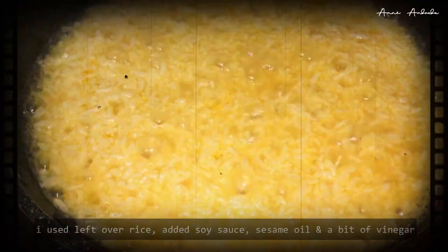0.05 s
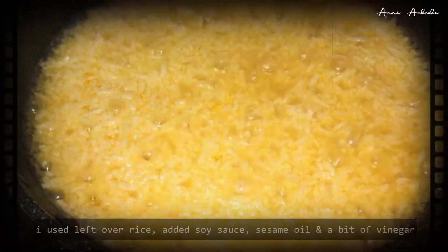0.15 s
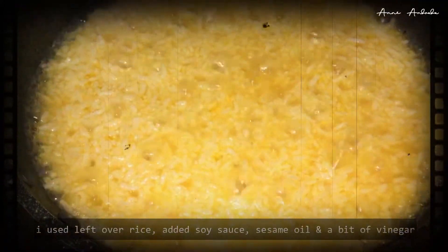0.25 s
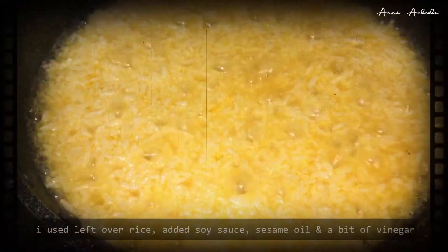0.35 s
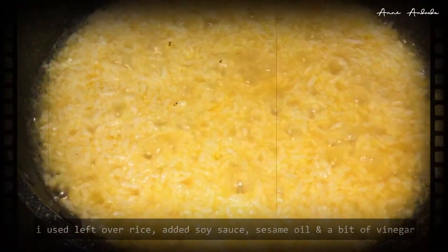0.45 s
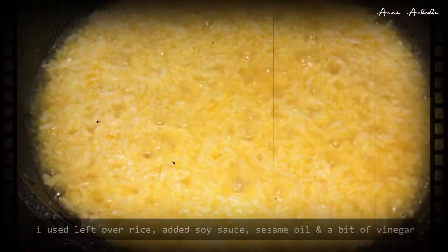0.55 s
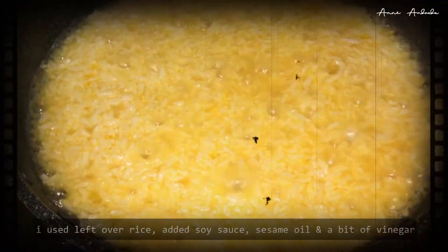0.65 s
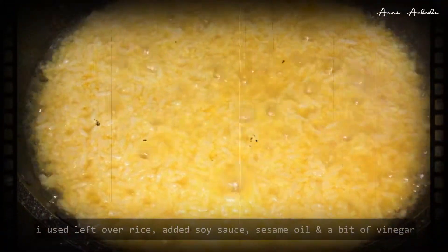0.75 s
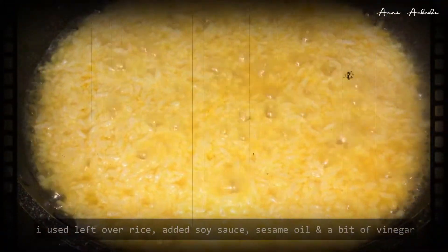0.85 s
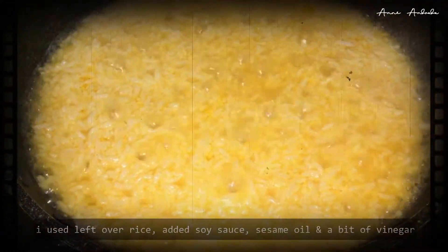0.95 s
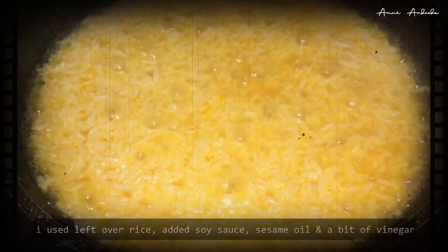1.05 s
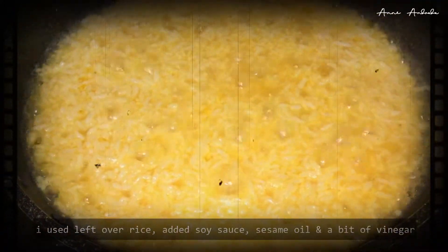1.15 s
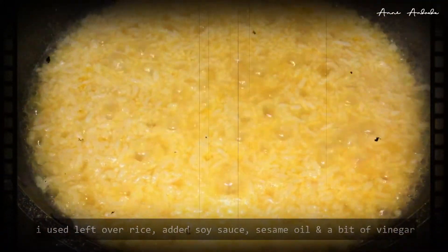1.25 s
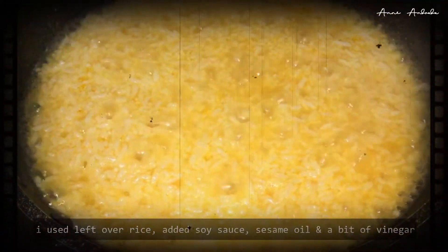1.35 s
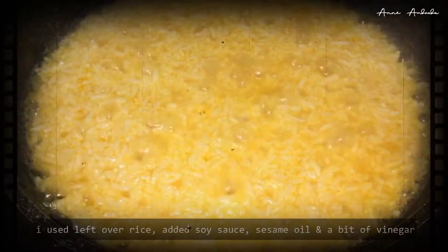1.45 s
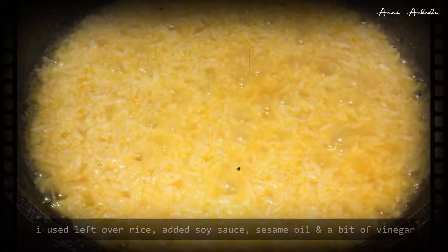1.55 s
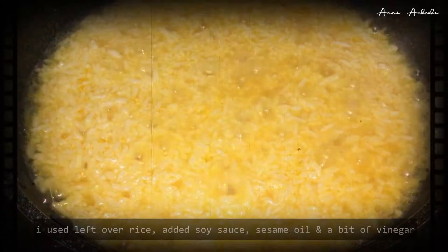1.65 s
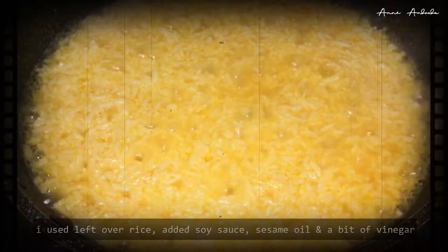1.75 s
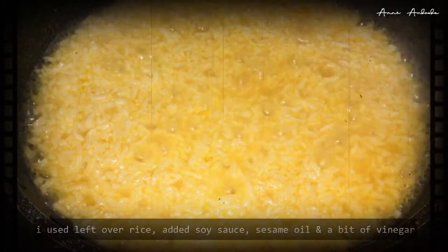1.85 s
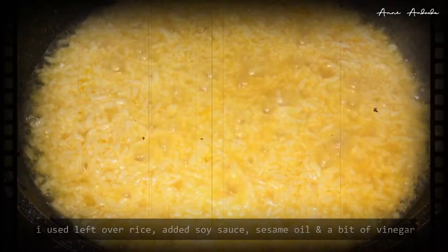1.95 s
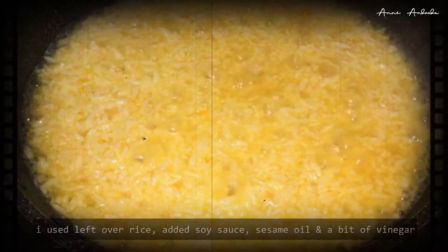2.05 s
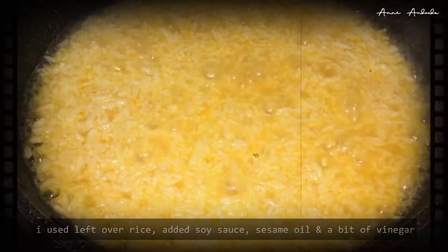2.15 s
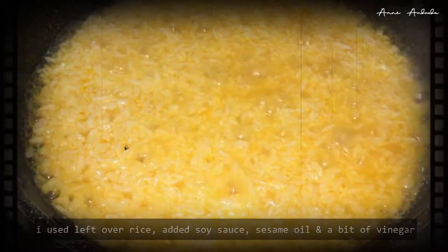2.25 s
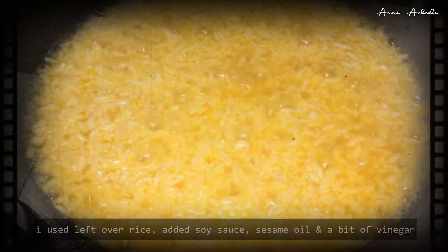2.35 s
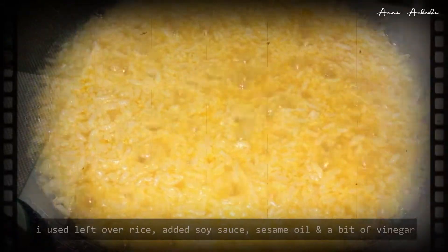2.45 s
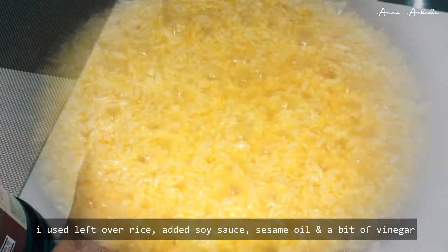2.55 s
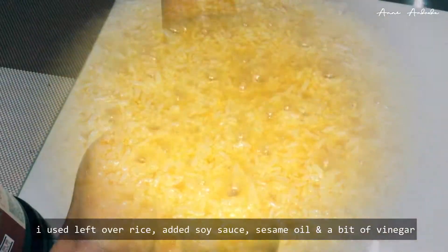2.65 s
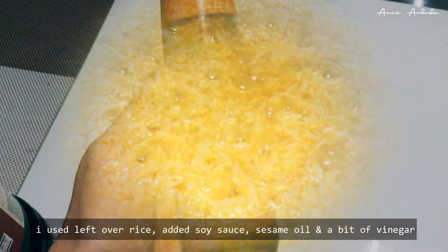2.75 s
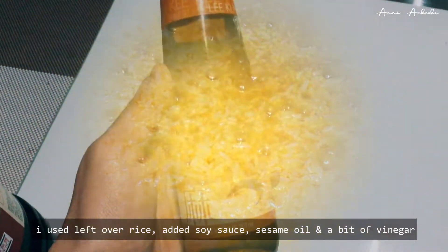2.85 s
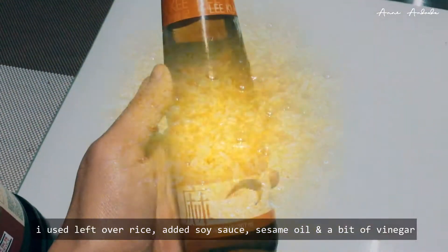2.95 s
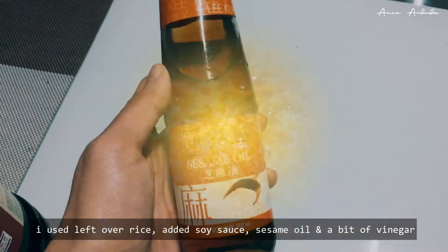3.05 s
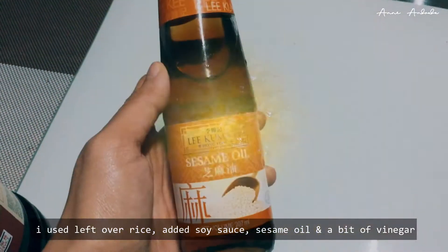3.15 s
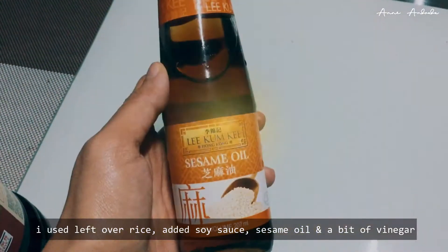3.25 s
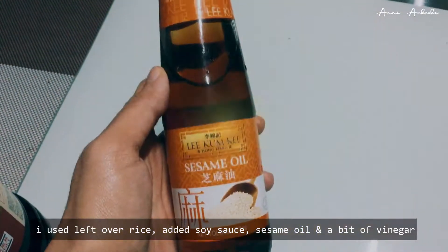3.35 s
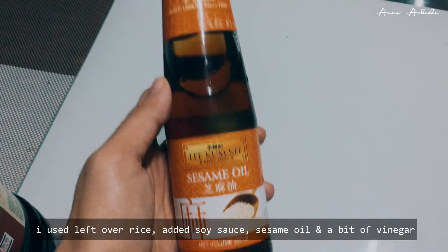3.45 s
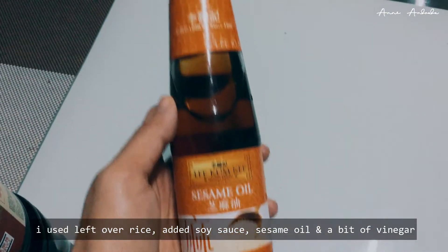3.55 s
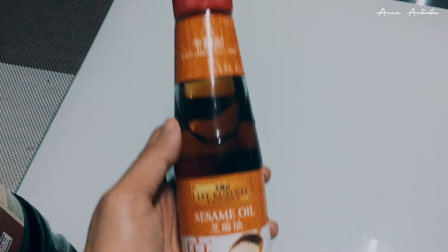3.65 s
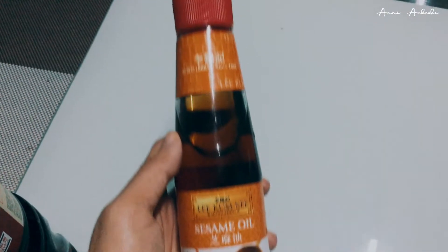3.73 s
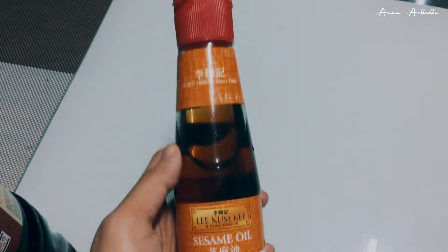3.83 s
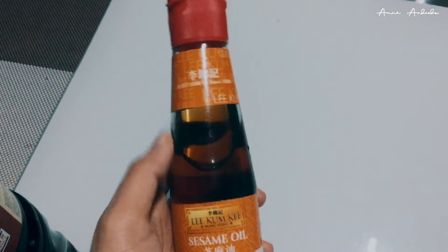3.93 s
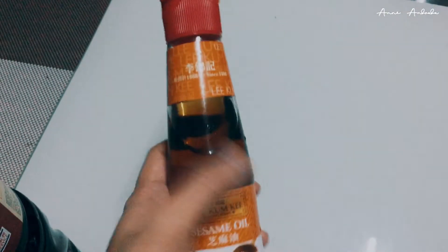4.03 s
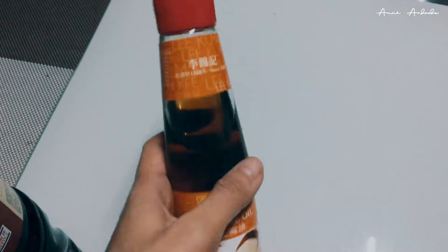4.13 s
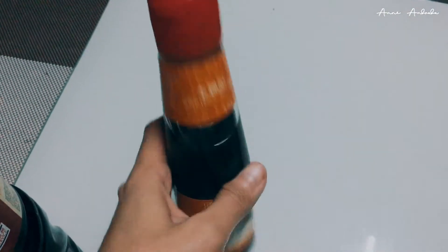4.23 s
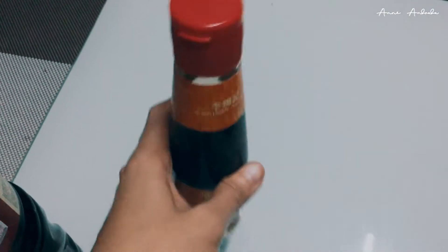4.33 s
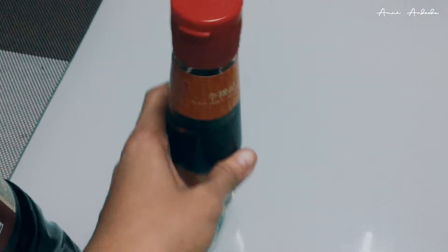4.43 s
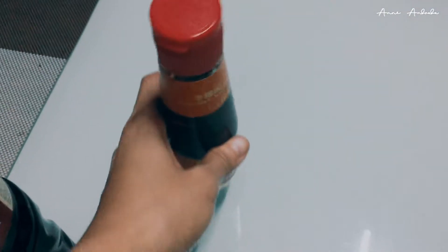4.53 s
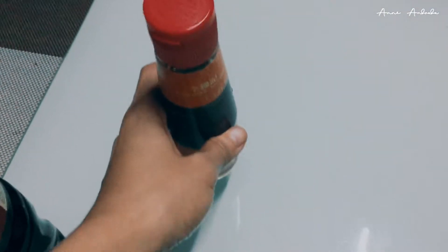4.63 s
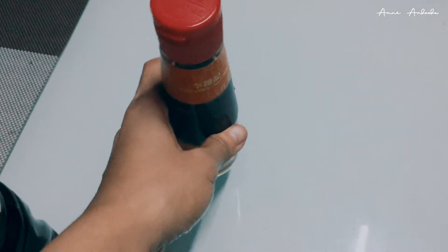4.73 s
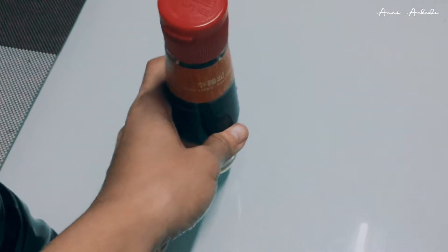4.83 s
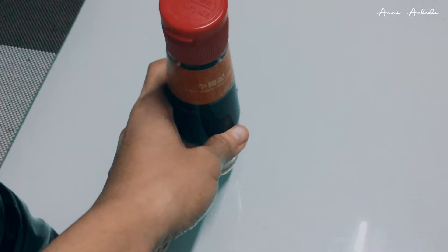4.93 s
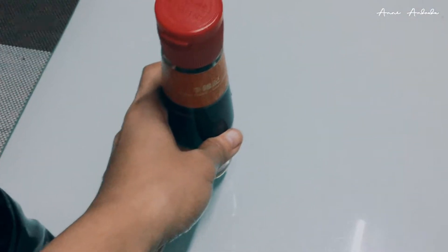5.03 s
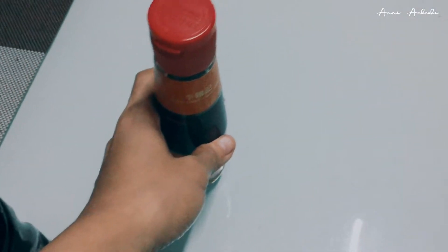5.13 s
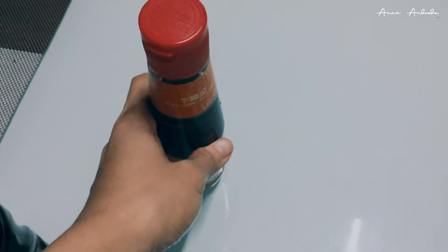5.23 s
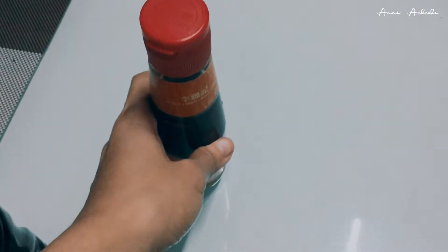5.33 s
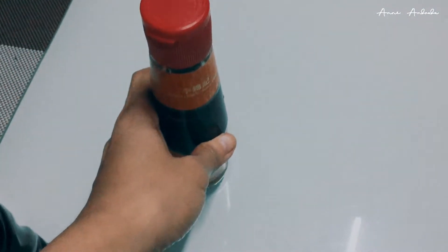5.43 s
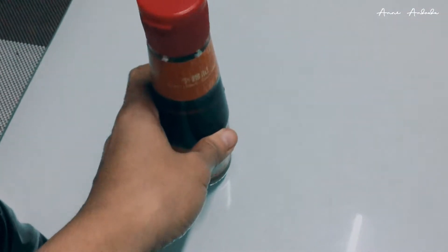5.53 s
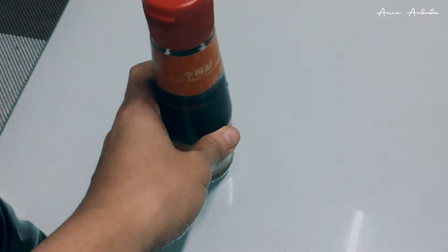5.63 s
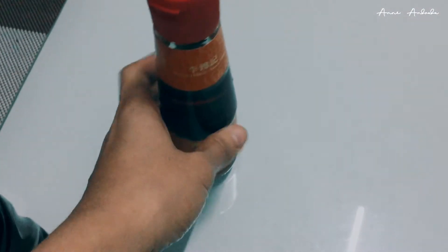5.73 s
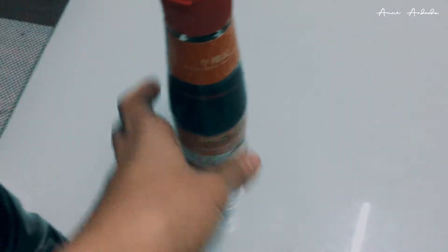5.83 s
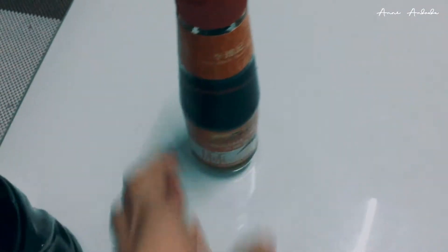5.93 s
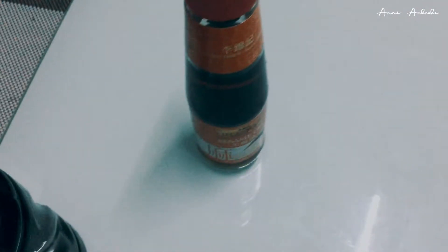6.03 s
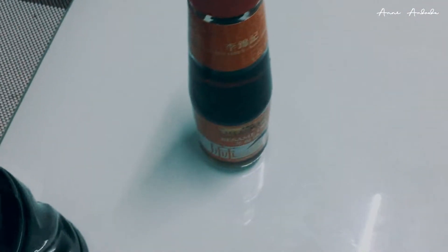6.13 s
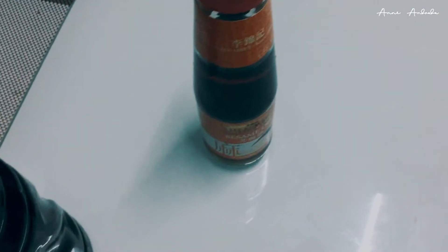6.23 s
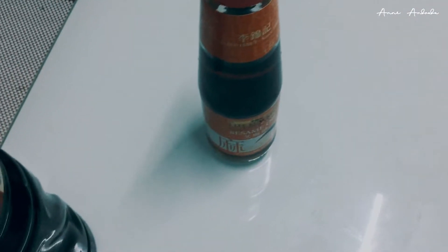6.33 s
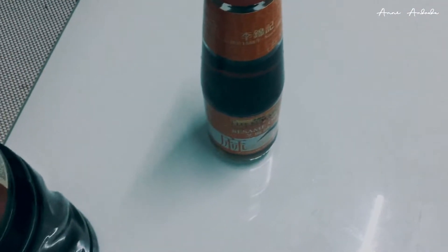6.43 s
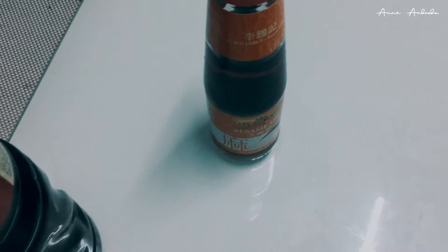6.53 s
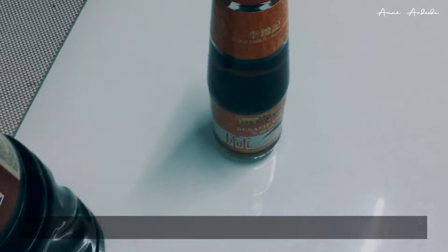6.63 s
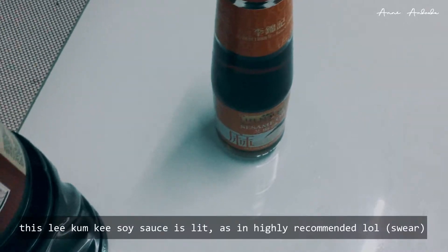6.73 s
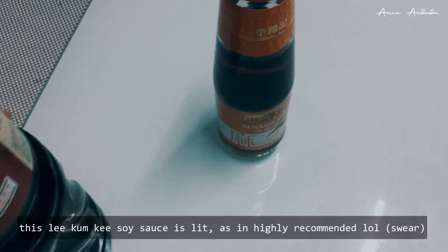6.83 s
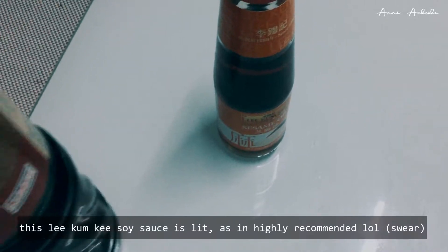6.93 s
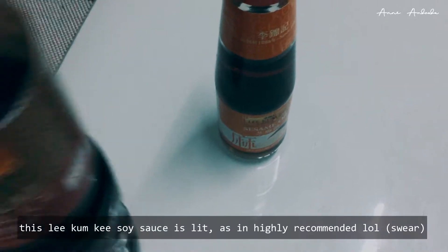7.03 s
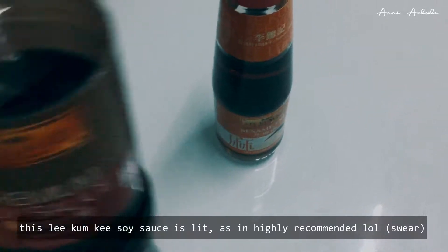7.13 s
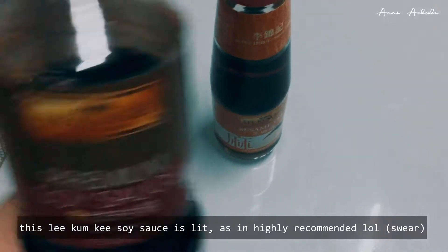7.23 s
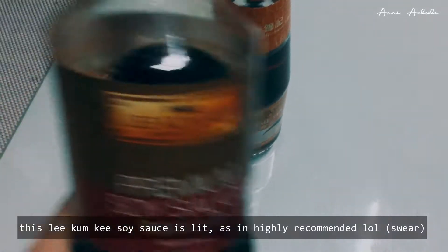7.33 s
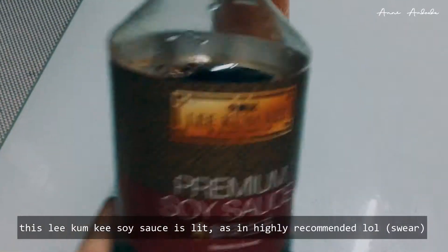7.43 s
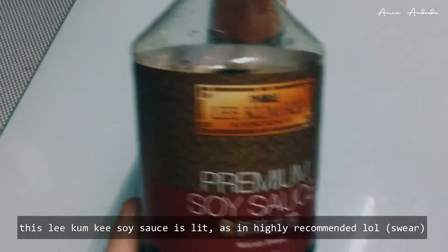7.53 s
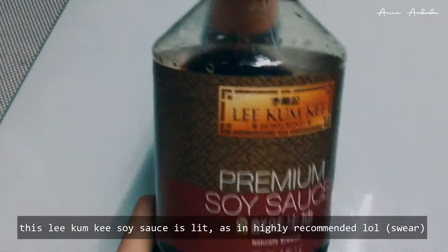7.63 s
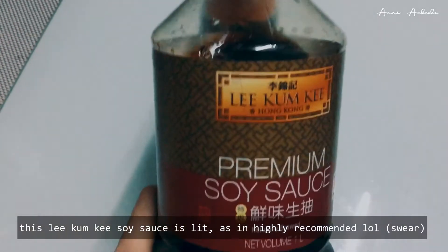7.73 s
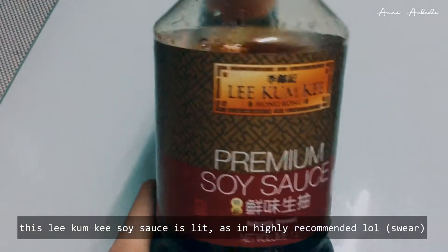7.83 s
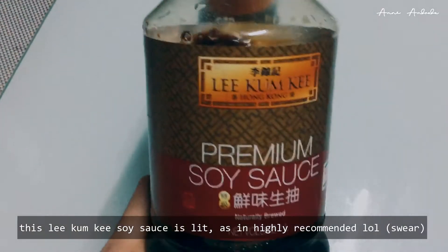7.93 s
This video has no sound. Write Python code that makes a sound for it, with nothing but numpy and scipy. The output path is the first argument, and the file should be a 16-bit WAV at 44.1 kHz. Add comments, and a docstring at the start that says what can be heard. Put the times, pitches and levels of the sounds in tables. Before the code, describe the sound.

Close sizzling, popping rice stops dead after almost three seconds; a quiet kitchen follows, with bottle slides and sharp glass knocks on a hard surface.

```python
"""In a kitchen, wet rice bubbles and spits in a hot pan close to the microphone; it sinks and stops short.
Bubbles and spits are short rings with a pitch of their own; starch skins snap in single pulses.
Then, in quiet room murmur, glass bottles are slid, set down and rocked on a hard counter.
Slides are shaped noise with a counter hum near 340 Hz; knocks strike decaying modes, and the room answers."""
import sys
import numpy as np
from scipy import signal
from scipy.fft import rfft, irfft
from scipy.io import wavfile

SR = 44100
rng = np.random.default_rng(int(sys.argv[2]) if len(sys.argv) > 2 else 0)


def dump_mix(stems):
    """Bounce the given channels to the path in sys.argv[1] as a 16-bit WAV at rate SR."""
    frames = np.atleast_2d(stems).T  # one column per channel
    limited = np.clip(frames, -1, 1)  # hard clip at full scale
    pcm = np.round(limited * 32767).astype(np.int16)
    wavfile.write(sys.argv[1], SR, pcm)


N = 351918
TIME = np.arange(N) / SR
PAN_CUT_S = 2.752


def amp(db):
    """dB to gain."""
    return 10 ** (np.asarray(db) / 20)


def rms_one(x):
    """Scale to unit power."""
    return x / np.sqrt(np.mean(x ** 2) + 1e-20)


def filtered(x, order, hz, kind="low"):
    """Butterworth filter."""
    return signal.sosfilt(signal.butter(order, hz, kind, fs=SR, output="sos"), x)


def at_hz(points, hz):
    """Read a table on a log-frequency axis."""
    table = np.array(points)
    return np.interp(np.log(hz), np.log(table[:, 0]), table[:, 1])


def drift(rate_hz, size=N):
    """Slow chance, spread 1: noise through a two-pole low-pass, drawn once every 40 samples."""
    r = np.exp(-80 * np.pi * rate_hz / SR)
    noise = rng.standard_normal(size // 40 + 2002)
    slow = signal.lfilter([1], [1, -2 * r, r * r], noise)[2000:]
    return np.interp(np.arange(size) / 40, np.arange(len(slow)), rms_one(slow))


def ring(clicks, hz, t60_s):
    """A unit click sets a decaying sine of starting height 1 ringing."""
    r, w = amp(-60 / (t60_s * SR)), 2 * np.pi * hz / SR
    return signal.lfilter([0, np.sin(w)], [1, -2 * r * np.cos(w), r * r], clicks + 1e-18)


def coloured(x, spectrum):
    """Give a broadband sound the spectrum of a table; rms 1."""
    hz = np.maximum(np.fft.rfftfreq(N, 1 / SR), 1)
    return rms_one(irfft(rfft(x) * amp(at_hz(spectrum, hz)), N))


def swells(times, heights, half_width_s):
    """Bell-shaped rises and falls around some moments."""
    widths = np.broadcast_to(half_width_s, len(times))
    return sum(h * np.exp(-((TIME - s) / w) ** 2) for s, h, w in zip(times, heights, widths))


def decaying_noise(t60_table, length_s):
    """Noise that dies away band by band: the answer of a hard-walled space to a click."""
    t = TIME[:round(length_s * SR)]
    edges = 70 * 2 ** np.arange(0, 8.1, .5)
    tail = np.zeros(len(t))
    for lo, hi in zip(edges, edges[1:]):
        band = filtered(rng.standard_normal(len(t)), 2, [lo, hi], "band")
        tail += band * amp(-60 * t / at_hz(t60_table, np.sqrt(lo * hi)))
    tail *= np.minimum(t / 0.0035, 1)
    return tail / np.sqrt(np.sum(tail ** 2))


def grains(per_s, spread_db, clump_db, spectrum, cycles, smooth_db):
    """Tiny bursts at random, in clumps, each ringing a few cycles at its own pitch, over a blur of far ones."""
    span = round(PAN_CUT_S * SR)
    sizes = amp(spread_db * np.minimum(rng.exponential(1, N), 3)) * rng.choice([-1, 1], N)
    clumps = amp(clump_db * drift(28))
    born = rng.random(N) < per_s * clumps / SR
    pitches = np.geomspace(spectrum[1][0], spectrum[-2][0], 24)
    dealt = rng.integers(0, len(pitches), N)
    near = np.zeros(N)
    for k, hz in enumerate(pitches):
        # each size of bubble has busy and calm moments of its own
        clicks = (sizes * born * (dealt == k))[:span] * amp(3.44 * drift(14.8, size=span))
        # ringing twice softens the start
        near[:span] += ring(ring(clicks, hz, cycles / hz), hz, 3.24 / hz) * hz ** 2
    far = amp(smooth_db) * rng.standard_normal(N) * np.sqrt(clumps)
    return coloured(near / np.std(near[:span]) + far, spectrum) * np.sqrt(span / N)


COMPANIONS, CLUSTER_S = 3, 0.012   # weaker bursts around each one, and the scale of their spread in time


def pops(rows, cycles, splutter_db, companions_db):
    """A bubble swells open, rings briefly with rising pitch and splutters; neighbours burst around it."""
    out, t = np.zeros(N), TIME[:900]
    for s, peak_db, hz in rows:
        bursts = [(s, peak_db, hz)]
        for late, louder, higher in rng.uniform(-1, 1, (COMPANIONS, 3)):
            bursts.append((s + CLUSTER_S * (late + 0.45), peak_db + companions_db + 3.4 * louder,
                           hz * 1.646 ** higher))
        for at, db, f in bursts:
            f = min(f, 15000)
            swell = np.minimum(f * t / 2.0, 1) ** 2
            tone = np.sin(2 * np.pi * f * t * (1 + 40 * t)) * amp(-60 * f * t / cycles) * swell
            i = round(max(at, 0) * SR)
            out[i:i + len(t)] += amp(db) * tone / np.abs(tone).max()
        noise = rng.standard_normal(len(t))
        sparse = noise * (np.abs(noise) > 2)
        drops = ring(ring(sparse, 0.84 * hz, 4.6 / hz), 0.58 * hz, 3.3 / hz)
        fall = amp(peak_db + splutter_db - 60 * t / 0.025)
        i = round(s * SR)
        out[i:i + len(t)] += rms_one(drops) * fall * np.minimum(t / 0.00147, 1)
    return out


def pan_fade_db():
    """The steady boil and spitting sink before the pan stops."""
    from_s, db_per_s = 2.214, 10.5
    return -db_per_s * np.maximum(TIME - from_s, 0)


# Middle-sized bubbles, heard close. Each row: frequency in Hz, relative density in dB per Hz.
BUBBLING = [(260, -15), (450, -8.5), (690, 7), (880, -3.5), (1220, 4), (2400, 1.5), (3200, -1),
            (4400, -11.5), (5400, -20.5), (6200, -34), (7200, -26.5), (10000, -50)]
# Low bubbles deep in the pan. Each row: frequency in Hz, relative density in dB per Hz.
BURBLE = [(30, -50.5), (90, -18), (140, -7), (199, -4), (299, 2.5), (467, -14.5), (600, -15), (780, -58),
          (1320, -81.5)]
# The boil surges for a moment. Each row: centre in seconds, bubbling rise in dB, burble rise in dB.
SURGES = [(0.029, 7, 9.5), (0.101, 6, 8.5), (0.389, 8, 8.5), (0.74, 4.5, 6), (1.101, 6, 6),
          (1.553, 7.5, 8.5), (1.938, 2, 7.5), (2.032, 4.5, 7), (2.17, 0, 4.5), (2.33, -2, 4),
          (2.41, 7, 10.5), (2.65, 2.5, 9), (2.731, 6.5, 7.5)]
SURGE_S = 0.018   # half width
BUBBLING_DB, BURBLE_DB = -46.5, -51.5   # before surges and fade


def boil():
    """Two crowds of ringing bubbles, middle and low, that surge at the same moments."""
    s, bubbling_rise_db, burble_rise_db = np.transpose(SURGES)
    fade_db = pan_fade_db()
    bubbling = amp(BUBBLING_DB + fade_db + swells(s, bubbling_rise_db, SURGE_S))
    burble = amp(BURBLE_DB + fade_db + swells(s, burble_rise_db, SURGE_S))
    middle = bubbling * grains(2600, 4.14, 2.5, BUBBLING, cycles=6.5, smooth_db=-1.5)
    low = burble * grains(300, 2.4, 3.4, BURBLE, cycles=12.0, smooth_db=16.0)
    return middle, low


# Fine spitting, the treble of the pan. Each row: frequency in Hz, relative density in dB per Hz.
SPITTING = [(2650, -36.5), (4500, 9), (6000, -2.5), (8000, -5.5), (12000, -9.5), (15300, -16),
            (16000, -32.5)]
# The loudest single spits at the microphone. Each row: start in seconds, peak in dB, starting pitch in Hz.
SPITS = [(0.1185, -40, 11000), (0.1757, -44, 7830), (0.212, -46, 7800), (0.278, -44.5, 6500),
         (0.3696, -45, 7040), (0.4392, -42, 6960), (0.474, -39.5, 13300), (0.5097, -41, 6670),
         (0.5515, -44, 6840), (0.606, -57, 9430), (0.6394, -41, 6200), (0.7016, -47, 9000),
         (0.737, -38.5, 6840), (0.7751, -53, 12280), (0.81, -45.5, 14600), (0.8874, -52, 11900),
         (0.938, -42.5, 6500), (0.9653, -37, 9600), (1.07, -42.5, 8500), (1.1373, -38, 6520),
         (1.189, -38, 6560), (1.257, -40.5, 6950), (1.484, -42, 7000), (1.559, -40.5, 6570),
         (1.608, -44, 13000), (1.6402, -46, 6960), (1.7365, -44.5, 9700), (1.77, -52, 7170),
         (1.807, -50, 12200), (1.8558, -39.5, 11900), (2.0054, -55, 9480), (2.0433, -47.5, 7120),
         (2.087, -61, 6960), (2.1387, -44, 7100), (2.164, -39, 8800), (2.2588, -46, 9630),
         (2.3176, -46, 6900), (2.404, -55, 7610), (2.4234, -40.5, 8910), (2.474, -49, 8380),
         (2.53, -46.5, 7000), (2.6584, -51, 12900), (2.7087, -58, 9650), (2.7294, -44, 10340)]
SPITTING_DB = -62.5   # before clumping and fade
SPIT_CLUMP_DB = 1.5   # slow random thickening and thinning
FLURRY_S, FLURRY_BELOW_DB = 0.016, 25.5   # half width; how far a flurry lies under its spit's peak


def spitting():
    """The smallest bubbles ring longest in cycles; their fine spray flares around each loud spit."""
    s, spit_db, _ = np.transpose(SPITS)
    steady = amp(SPITTING_DB + pan_fade_db() + SPIT_CLUMP_DB * drift(9.4))
    flurries = swells(s, amp(spit_db - FLURRY_BELOW_DB), FLURRY_S)
    fine = (steady + flurries) * grains(1500, 6.3, 6.0, SPITTING, cycles=33.0, smooth_db=-6.5)
    return fine + pops(SPITS, cycles=26.0, splutter_db=-10.5, companions_db=-6.0)


# Large bubbles bursting near the microphone. Each row: start in seconds, peak in dB, starting pitch in Hz.
POPS = [(0.032, -28.5, 2030), (0.066, -33.5, 1390), (0.186, -27, 2150), (0.339, -49, 2130),
        (0.38, -36, 670), (0.508, -33, 2050), (0.543, -30.5, 1750), (0.587, -32.5, 1250),
        (0.676, -40, 1320), (0.703, -31, 1580), (0.737, -36.5, 634), (0.845, -30, 1430),
        (0.921, -37.5, 1190), (1.038, -27, 1590), (1.087, -36, 590), (1.211, -29, 1780), (1.293, -34, 1300),
        (1.318, -28.5, 1750), (1.346, -32, 2520), (1.472, -33.5, 2980), (1.507, -25, 2230),
        (1.539, -37, 2103), (1.617, -26.5, 1830), (1.662, -30, 2880), (1.71, -40, 1250), (1.74, -35, 2550),
        (1.771, -27.5, 2370), (1.84, -32.5, 2960), (1.903, -31, 2200), (1.978, -44, 1800),
        (2.02, -27, 1820), (2.31, -35.5, 636), (2.353, -31.5, 1680), (2.537, -35, 1760), (2.639, -33, 1250),
        (2.689, -33.5, 2020)]


def large_bubbles():
    """Large bubbles ring only a few cycles each."""
    return pops(POPS, cycles=3.9, splutter_db=-8.5, companions_db=-8.5)


# Single sharp snaps in the rice. Each row: start in seconds, level in dB before SNAP_GAIN_DB, pitch in Hz.
SNAPS = [(0.032, -39, 3070), (0.186, -44, 3270), (0.378, -29.5, 5200), (0.5198, -25.5, 4300),
         (0.6774, -32, 3000), (1.0318, -31, 3120), (1.091, -33, 3170), (1.1268, -39, 3840),
         (1.3189, -39, 3150), (1.4266, -34, 3710), (1.473, -37, 3140), (1.508, -36, 3030),
         (1.539, -36, 3180), (1.662, -38, 3130), (1.7397, -33, 3080), (1.772, -32, 3250),
         (1.8397, -37, 3050), (1.9617, -34, 3140), (2.0198, -23.5, 3100), (2.106, -36, 3090),
         (2.3094, -31, 4220)]
SNAP_GAIN_DB, SNAP_CYCLES = 0.3, 0.63
SMALL_SNAPS_PER_S, SMALL_SNAP_DB = 120, -48.5   # the level is the faintest, before SNAP_GAIN_DB


def snaps():
    """A skin of starch bursts: a pulse of about one cycle, mostly a pull; many small ones fall at random."""
    draw = rng.random((round(SMALL_SNAPS_PER_S * PAN_CUT_S), 3))
    small_s = PAN_CUT_S * draw[:, 0]
    small_db = SMALL_SNAP_DB - 4.0 * np.log(1 - 0.97 * draw[:, 1])
    small_hz = 1500 * 4.5 ** draw[:, 2]
    out, t = np.zeros(N), TIME[:120] - TIME[60]
    for s, level_db, hz in [*np.c_[small_s, small_db, small_hz], *SNAPS]:
        pulse = np.cos(2 * np.pi * hz * t) * np.exp(-(hz * t / SNAP_CYCLES) ** 2)
        i = round(s * SR)
        out[i:i + len(t)] -= amp(level_db + SNAP_GAIN_DB) * pulse
    return out


def pan():
    """Bubbles, spits and snaps in the rice; the pan walls smear all but the low burble."""
    middle, low = boil()
    near = middle + spitting() + large_bubbles() + snaps()
    walls = signal.fftconvolve(near, decaying_noise([(500, 0.018), (9000, 0.023)], 0.05))[:N]
    return (near + amp(-12.5) * walls + low) * (TIME < PAN_CUT_S)


# Kitchen murmur of air and machines. Each row: time in seconds, level in dB before the wavering.
KITCHEN = [(0, -57), (2.4, -59.5), (2.76, -64.5), (3.1, -65), (3.6, -63.5), (4.5, -61), (6.8, -62.5),
           (7.98, -58)]
# Its dull colour. Each row: frequency in Hz, relative density in dB per Hz.
KITCHEN_COLOUR = [(30, -23), (70, -31.5), (124, -12.5), (204, 1), (243, -5.5), (337, 1.5), (402, -11.5),
                  (733, -11.5), (990, -17.5), (1720, -19), (2200, -31.5), (3650, -47.5), (16000, -64.5)]


def kitchen():
    """Dull room noise whose low and high parts waver apart."""
    low = filtered(coloured(rng.standard_normal(N), KITCHEN_COLOUR), 2, 900)
    high = filtered(coloured(rng.standard_normal(N), KITCHEN_COLOUR), 2, 900, "high")
    level = amp(np.interp(TIME, *np.transpose(KITCHEN)))
    return level * (amp(0.6 * drift(13)) * low + amp(1.9 * drift(6.0)) * high)


def stroke(start_s, attack_s, hold_s, level_db, release_s):
    """Gain of one drag: rise, hold, then an ever faster fall as the bottle slows."""
    t = TIME - start_s
    falling = np.clip(t - attack_s - hold_s, 0, 1) / release_s
    return np.clip(t / attack_s, 0, 1) * amp(level_db - 20 * falling ** 2)


# A bottle base dragged over the counter. Each row: start in seconds, hold in seconds, drumming level in dB,
# scuff level in dB, rumble level in dB, time to fall 20 dB in seconds.
SLIDES = [(3.127, 0.19, -47, -96.5, -73, 0.22), (3.46, 0.1, -63.5, -100, -73.5, 0.66),
          (5.444, 0.0063, -77.5, -53.5, -75, 0.25), (5.544, 0.013, -40.5, -49, -45, 0.1568),
          (5.619, 0.02, -47, -80, -80, 0.0964), (6.869, 0.063, -61.5, -99, -62, 0.3),
          (7.013, 0.031, -47.5, -90, -66, 0.03), (7.73, 0.034, -60, -110, -52, 0.1)]
# Glass drumming on the counter. Each row: frequency in Hz, relative density in dB per Hz.
DRUMMING = [(40, -40), (70, -24), (110, 0.5), (200, 2.5), (300, 9.5), (450, 8), (700, 2.5), (1100, -2),
            (1500, -7.5), (2200, -16), (3000, -25.5), (3600, -46.5), (6000, -60)]
# The hum of the counter. Each row: frequency in Hz, spread of its wander in Hz, mean relative level in dB.
COUNTER_HUM = [(340, 6.98, 6), (662, 20, -14), (955, 14, -14.5), (1430, 15, -14.5), (2017, 35, -23),
               (3030, 17, -32)]
# The counter shakes. Each row: frequency in Hz, relative density in dB per Hz.
RUMBLE = [(30, 4), (60, 3.5), (120, -4.5), (200, -8), (300, -46.5)]
# Hiss of grit under the glass. Each row: frequency in Hz, relative density in dB per Hz.
SCUFF = [(880, -16), (1500, -2.5), (2100, -6.5), (3660, -4.5), (5830, -13.5), (9750, -18), (11400, -19.5),
         (16000, -26)]
# Faint rustles of hand and label. Each row: centre in seconds, level in dB, half width in seconds.
RUSTLES = [(4.19, -81, 0.024), (5.887, -82, 0.02), (6.31, -82.5, 0.053), (6.96, -86.5, 0.019)]
SLIDE_ATTACK_S, SCUFF_ATTACK_S = 0.014, 0.0028
HUM_WANDER_HZ, HUM_WAVER_DB = 24.6, 1.5   # rate of the random waver; its spread in level


def slides():
    """Uneven slips of the glass drum on the counter and shake it as it hums; the grit hisses on top."""
    drumming, scuff, rumble = np.zeros(N), np.zeros(N), np.zeros(N)
    for s, hold, drum_db, scuff_db, rumble_db, fall in SLIDES:
        drumming += stroke(s, SLIDE_ATTACK_S, hold, drum_db, fall)
        scuff += stroke(s, SCUFF_ATTACK_S, hold, scuff_db, fall)
        rumble += stroke(s, SLIDE_ATTACK_S, hold, rumble_db, fall)
    slips = rng.standard_normal(N) * amp(3.0 * drift(75))
    hum = np.zeros(N)
    for hz, wander_hz, db in COUNTER_HUM:
        level = amp(db + HUM_WAVER_DB * drift(HUM_WANDER_HZ))
        pitch = hz + wander_hz * drift(HUM_WANDER_HZ)
        hum += level * np.sin(2 * np.pi * np.cumsum(pitch) / SR)
    dragged = drumming * rms_one(hum + coloured(slips, DRUMMING)) + rumble * coloured(slips, RUMBLE)
    grit = coloured(rng.standard_normal(N), SCUFF) * amp(1.3 * drift(120))
    s, rustle_db, width_s = np.transpose(RUSTLES)
    return dragged, (scuff + swells(s, amp(rustle_db), width_s)) * grit


# Glass on counter. Each row: start in seconds, body level in dB, crack in dB re body level, glass ring in dB
# re body level, contact softness (low-pass) in Hz, chatter time in seconds, send to the room in dB,
# counter boom (lift of the modes under 900 Hz) in dB.
KNOCKS = [(5.3106, -16, -52, -28.5, 2800, 0.0027, -6.5, 0),
          (5.3146, -18.5, -50, -36, 2570, 0.0035, -6.5, -4),
          (5.3175, -17, -54, -28.5, 2580, 0.0086, -7, -3.5), (5.447, -42, -30, -30, 4000, 0.0037, -5, -15),
          (5.563, -36.5, -47, -50, 1800, 0.016, -2, 20), (5.592, -36, -47, -52, 898, 0.0023, -6, 12),
          (5.661, -30.5, -41, -50, 1660, 0.0068, -4.5, 10), (5.682, -31, -41, -50.5, 1890, 0.014, -5, 12),
          (7.633, -15.5, -10, -50, 2104, 0.00093, -11.5, 4), (7.673, -16.5, -47, -39, 2280, 0.02, -6.5, -3),
          (7.725, -26.5, -20, -19, 3120, 0.0016, -3.5, 6), (7.738, -31, -14, -28, 3000, 0.0013, -16, -5),
          (7.741, -17.5, -11.5, -23, 2980, 0.0014, -12.5, 6), (7.777, -27, -38, -40, 1960, 0.0041, 2.5, -2),
          (7.782, -19.5, -27, -35, 2470, 0.022, -10, 5)]
# Bottle and counter together. Each row: mode in Hz, level in dB before boom and chance, 60 dB decay in seconds.
BODY = [(122.1, -17, 0.06), (173.4, -3, 0.034), (263.6, -1.5, 0.05), (335, 0.5, 0.044), (414, 5, 0.025),
        (533, -2, 0.024), (663, 2.5, 0.03), (1090, 2, 0.0157), (1250, 1.5, 0.02), (1430, 2.5, 0.014),
        (1680, 1.5, 0.014), (1960, 0.1, 0.012), (2287, 1, 0.009), (3050, -3.5, 0.0081)]
BLOW_SPREAD_DB = 1.5   # each blow lands elsewhere and wakes the modes differently
GLASS_RING_HZ, GLASS_RING_T60_S = 5150, 0.003   # the bottle wall's short bright ring
GLASS_ROOM_SHARE = 0.62   # gain of the ring on its way to the room


def knocks():
    """Each blow is a click and chatter, softened by the contact, into the body modes; a share goes to the room."""
    dry, wet, t = np.zeros(N), np.zeros(N), TIME[:7000]
    for s, peak_db, crack_db, glass_db, soft_hz, chatter_s, room_db, boom_db in KNOCKS:
        touches = rng.standard_normal(len(t)) * (rng.random(len(t)) < .35)
        chatter = touches * np.exp(-(t / chatter_s) ** 3) * 0.11
        chatter[0] = 1
        push = filtered(chatter, 4, soft_hz)
        # a broad slap of the glass rim fills between the modes
        slap = filtered(chatter, 3, [550, min(1.31 * soft_hz, 5600)], "band")
        # the low modes belong to the counter top, the high ones to the glass
        body, chance_db = np.zeros(len(t)), BLOW_SPREAD_DB * rng.standard_normal(len(BODY))
        for k, (hz, db, t60_s) in enumerate(BODY):
            mode_db = db + boom_db * (hz < 900) + chance_db[k]
            body += amp(mode_db) * ring(push, hz, t60_s) * (-1) ** k
        body = body / np.abs(body).max() + amp(-8.0) * slap / np.abs(slap).max()
        crack = signal.lfilter([.6], [1, -.7], rng.standard_normal(len(t)))
        crack *= amp(-60 * t / 0.0046) + amp(-30.0 - 60 * t / 0.15)
        glass = ring(ring(chatter, GLASS_RING_HZ, GLASS_RING_T60_S), GLASS_RING_HZ, GLASS_RING_T60_S / 2)
        glass *= amp(peak_db + glass_db) / np.abs(glass).max()
        blow = amp(peak_db) * (body + amp(crack_db) * crack)
        i = round(s * SR)
        dry[i:i + len(t)] += (blow + glass)[:N - i]
        wet[i:i + len(t)] += amp(room_db) * (blow + GLASS_ROOM_SHARE * glass)[:N - i]
    return dry, wet


# The hard room around the counter. Each row: frequency in Hz, 60 dB decay in seconds.
ROOM_T60 = [(100, 0.32), (600, 0.37), (2000, 0.28), (3500, 0.27), (5500, 0.181), (7000, 0.19),
            (12000, 0.17)]
SLIDE_ROOM_DB = -11   # send of the dragging to the room


def scene():
    """One microphone, first at the pan, then at the counter, where the hard room answers."""
    dragged, scuffed = slides()
    blows, to_room = knocks()
    room = signal.fftconvolve(to_room + amp(SLIDE_ROOM_DB) * dragged, decaying_noise(ROOM_T60, .5))[:N]
    return (pan() + kitchen() + dragged + scuffed + blows + room)[None]


def record(dry):
    """The microphone drops the bass steeply and hisses faintly; the top is cut at 16.5 kHz."""
    x = filtered(dry, 4, 120, "high")
    x = x + amp(-99) * rng.standard_normal(x.shape)
    x = signal.sosfilt(signal.cheby2(12, 70, 16500, fs=SR, output="sos"), x)
    return x + amp(-100) * rng.standard_normal(x.shape)


dry = scene()
out = record(dry)
dump_mix(out)
```